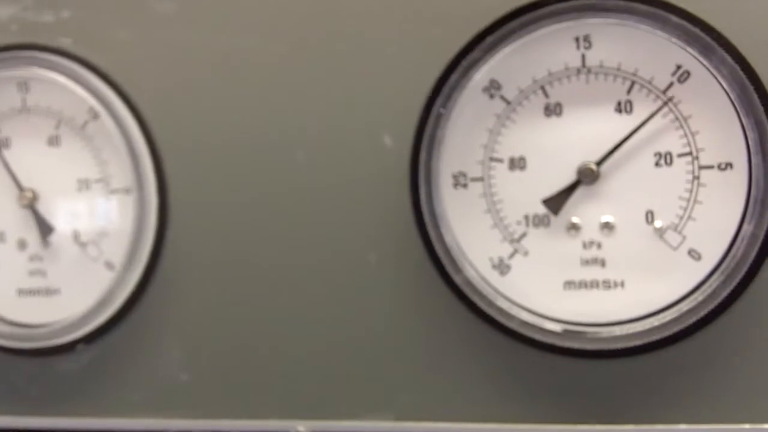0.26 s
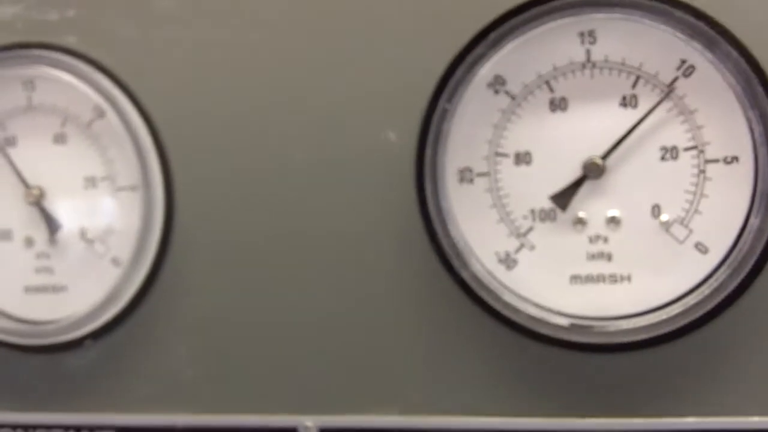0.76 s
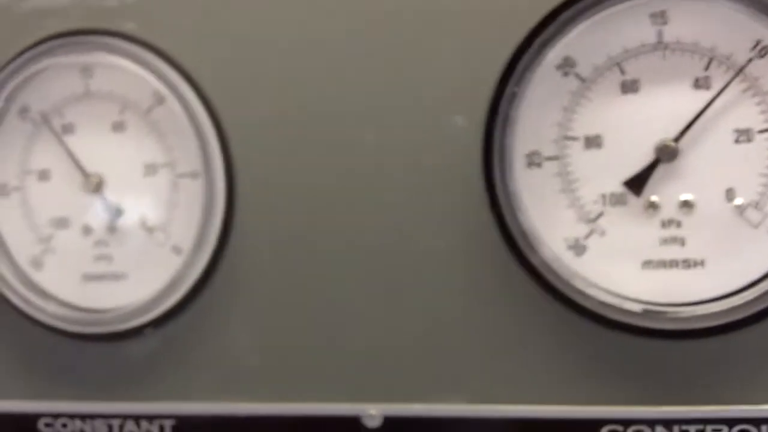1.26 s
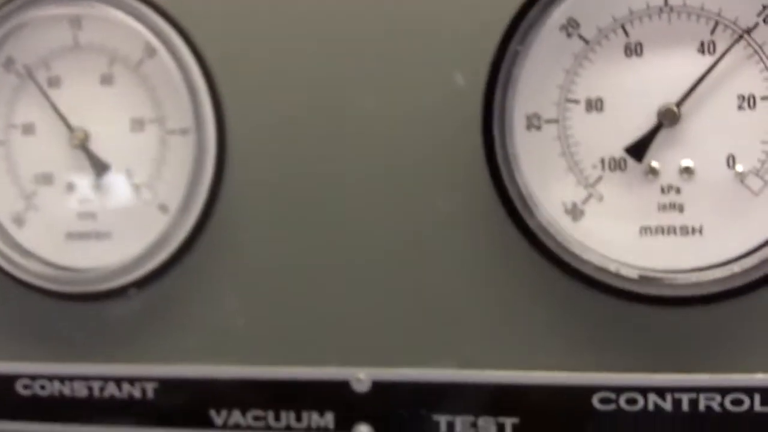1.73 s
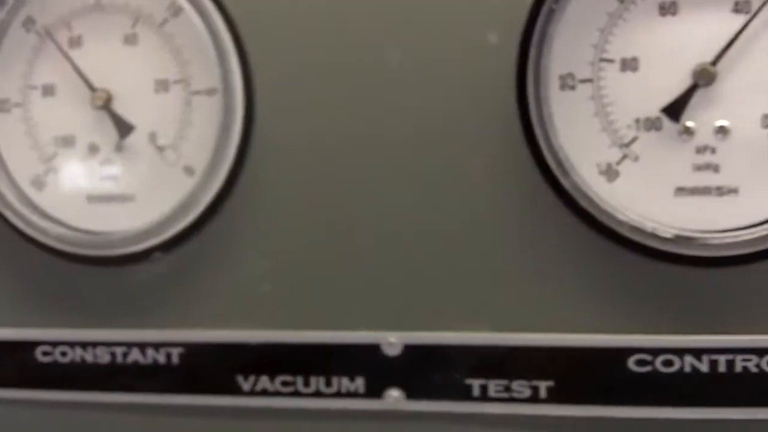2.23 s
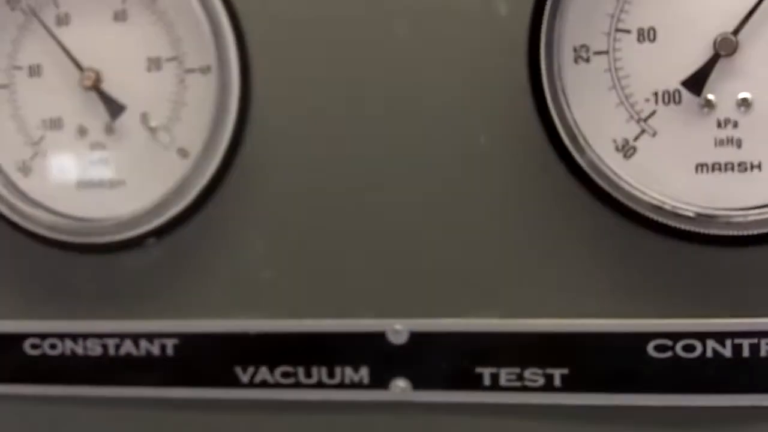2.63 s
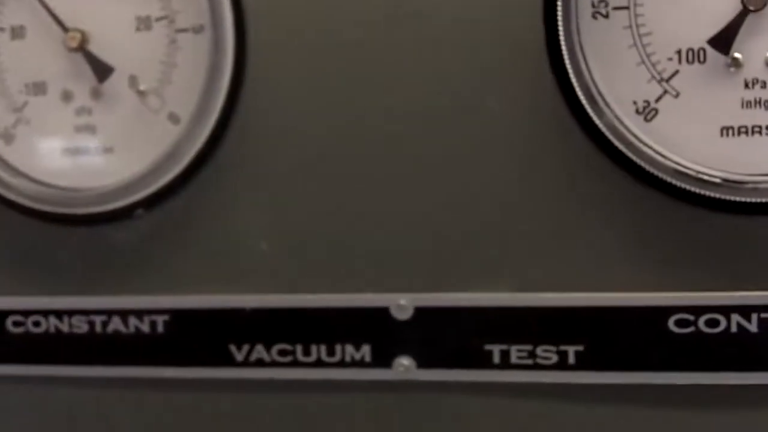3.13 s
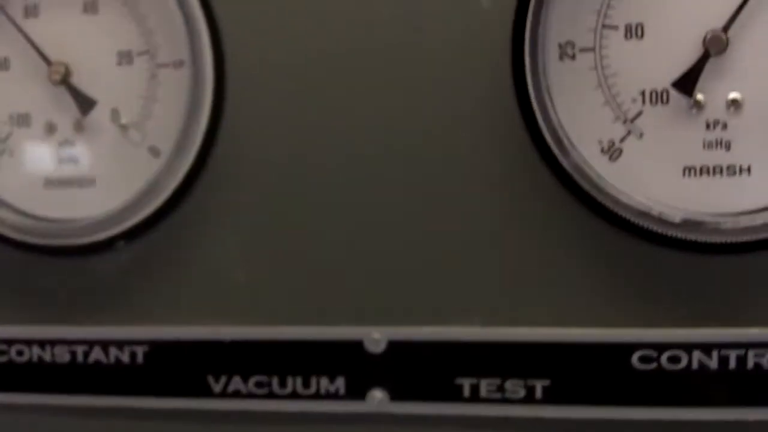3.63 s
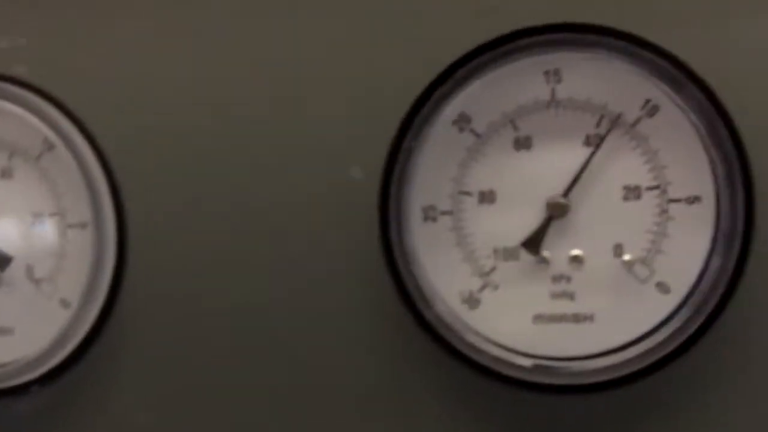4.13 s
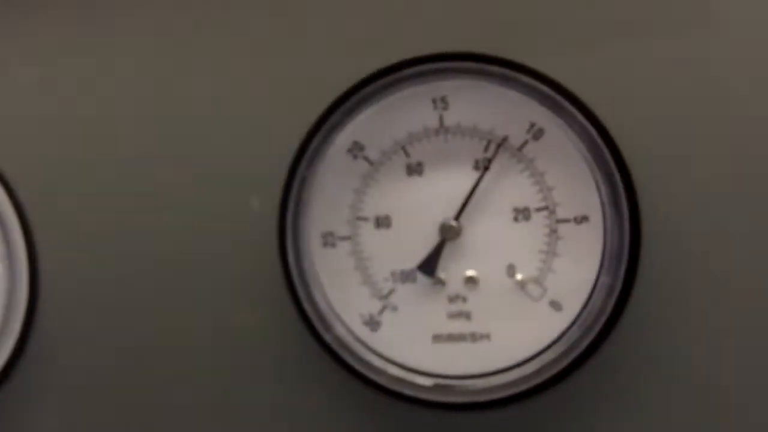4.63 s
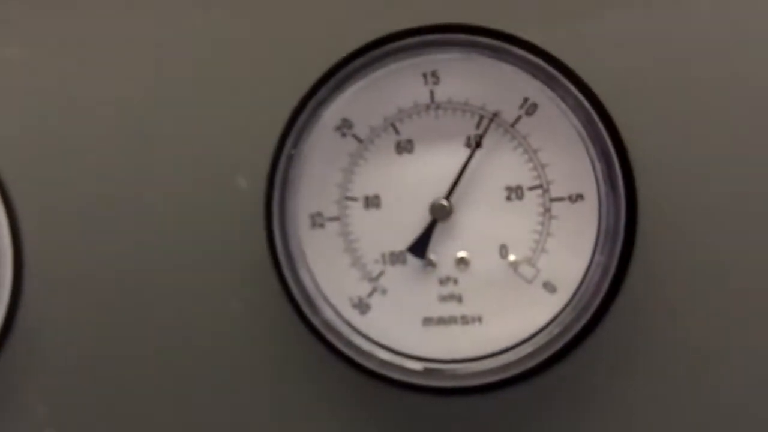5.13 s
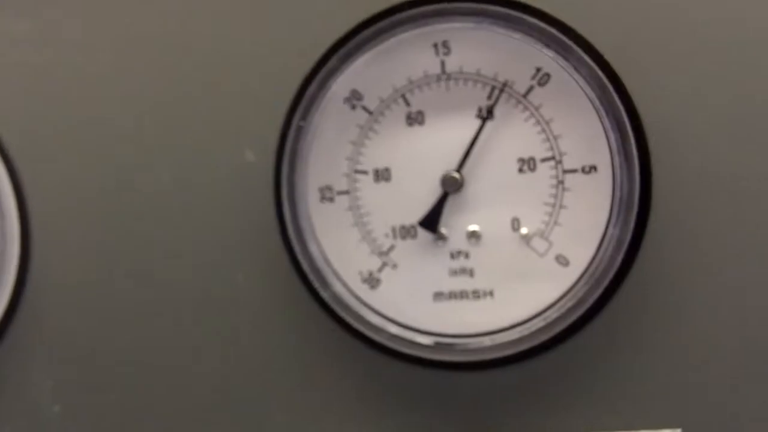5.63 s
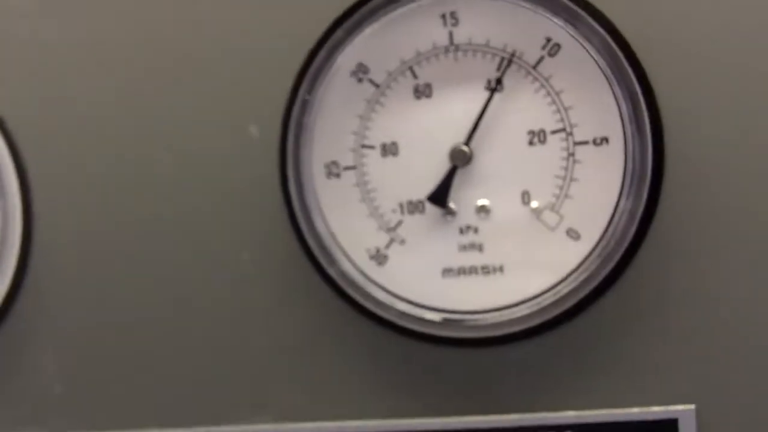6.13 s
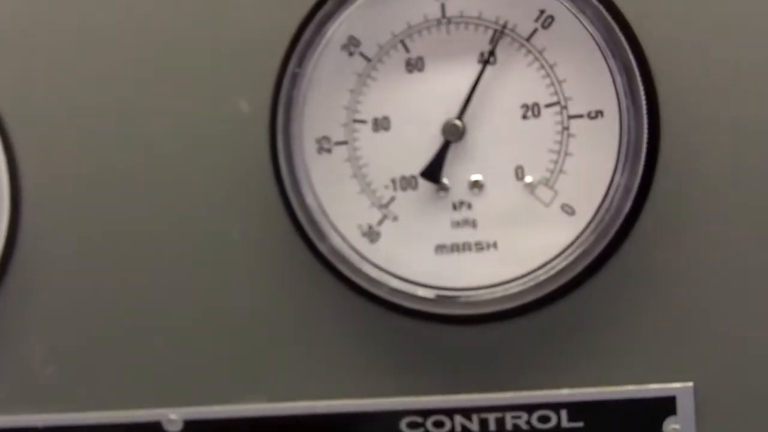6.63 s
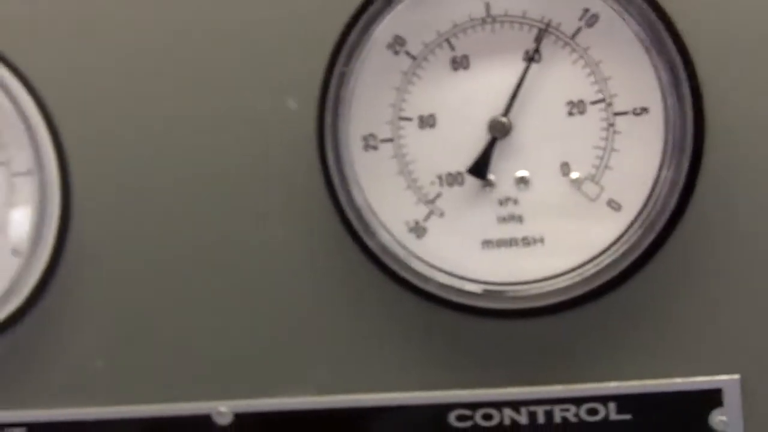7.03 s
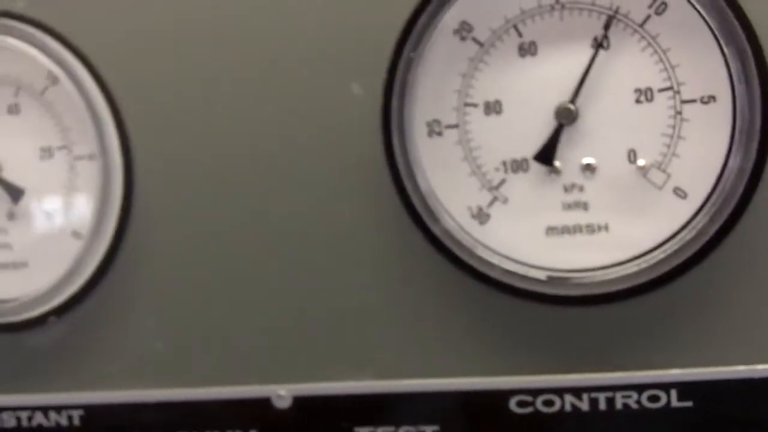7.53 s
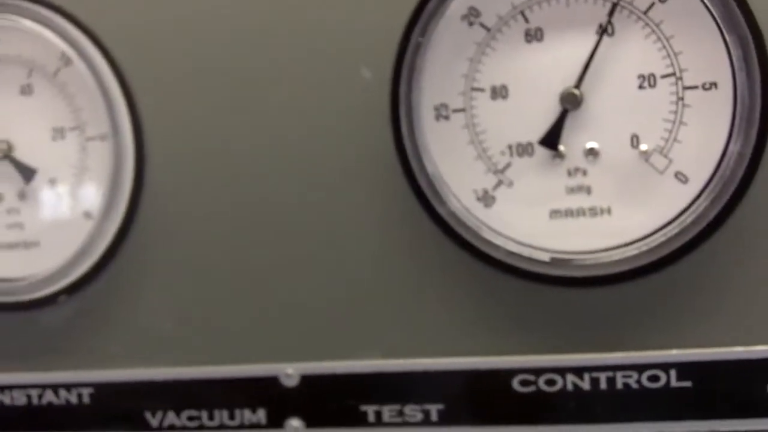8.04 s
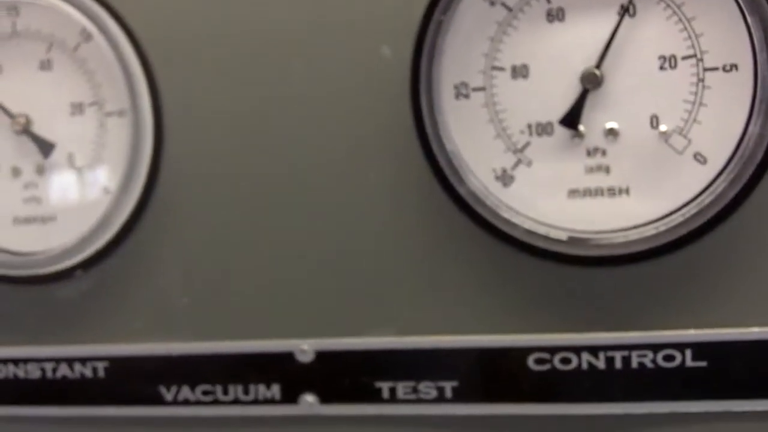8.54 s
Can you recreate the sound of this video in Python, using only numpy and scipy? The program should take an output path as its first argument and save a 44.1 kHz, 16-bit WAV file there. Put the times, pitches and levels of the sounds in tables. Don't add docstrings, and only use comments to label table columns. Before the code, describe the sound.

Close to a small vacuum pump on a workshop bench, a deep electric hum carries a rapid chugging flutter of about twenty strokes per second. The speed sags and recovers, strongest in the first half. Airy pipe noise pulses along, hollow knocks and tiny ticks increase later, and one short dry scuff comes near two and a half seconds. A second machine drones faintly farther off. Close phone pickup, nearly mono, with slight hiss.

```python
import sys
import numpy as np
from scipy import signal
from scipy.fft import rfft, irfft, next_fast_len
from scipy.io import wavfile
from scipy.ndimage import map_coordinates

SR = 44100
rng = np.random.default_rng(int(sys.argv[2]) if len(sys.argv) > 2 else 0)


def file_out(sig):
    cols = np.atleast_2d(sig).T
    lim = np.clip(cols, -1, 1)
    pcm = np.round(lim * 32767).astype(np.int16)
    wavfile.write(sys.argv[1], SR, pcm)


def magnitude_from_level(level_db):
    exponent = np.asarray(level_db, float) / 20
    return 10 ** exponent


N = 386757
T = np.arange(N) / SR

HUM_HZ = 119.95
SLOW_HZ, FAST_HZ, FREE_HZ = 20.3, 20.95, 21.07

# [mid-fall t/s, mid-recovery t/s, loss f/Hz]
SAGS = [
    (.05, 1.16, 1.08),
    (1.72, 2.46, .93),
    (3.24, 3.77, .52),
    (4.51, 4.7, .66),
    (5.8, 6.24, .33),
    (7.17, 7.36, .36),
    (7.67, 7.8, .3),
    (8.7, 9.2, .33),
]
# [shaft f/Hz, shake level/dB]
SHAKE_LAW = [(20, -30), (20.2, -34), (20.45, -36), (20.66, -33), (20.84, -27), (21.05, -24.8)]
# [shaft f/Hz, hum level/dB]
HUM_LAW = [(20, -23), (20.2, -23.5), (20.45, -22.5), (20.85, -22), (21.05, -23)]
# [multiple, slow level/dB, fast level/dB]
SHAFT_ORDERS = [(1, -50, -46), (2, -35, -38.5), (4, -50, -43), (5, -34.5, -41), (7, -56, -52),
                (8, -52, -54), (9, -52, -50), (10, -52, -56), (11, -52, -48), (13, -58, -45),
                (14, -46, -56), (27, -58, -47)]
# [multiple, slow level/dB, fast level/dB]
STROKE_ORDERS = [(16, -52, -52), (17, -45, -44), (18, -46, -46), (19, -43, -42.5), (20, -46, -49),
                 (21, -50, -48)]
# [hum multiple, added shaft order, slow level/dB, fast level/dB]
FIELD_LINES = [(1, -1, -22, -15.5), (1, 1, -13, -19.5), (1, 2, -27, -31), (1, 3, -22, -20),
               (2, -1, -30, -20.5), (2, 0, -28, -22), (2, 2, -31, -27), (3, 0, -20, -19), (5, 0, -30, -28)]
# [f/Hz, level/dB]
FAR_LINES = [(29.69, -37), (30.34, -50), (51.25, -43), (59.38, -49), (89.08, -49)]
# [f/Hz, slow level/dB, fast level/dB, extra at first level/dB]
PANELS = [(286.6, -45.5, -42, 3), (222.2, -54.5, -41.5, -1), (583.5, -47, -42.5, -2.5)]

# [f/Hz, width f/Hz, level/dB]
MOUNT_MODES = [(375, 150, 0)]
CASING_MODES = [(277.4, 20, -9), (334.5, 40, -9.5), (385.6, 19, -5.5), (397.4, 17, -4), (473, 100, -8)]
PIPE_MODES = [(551, 61, -3), (647.4, 80, 1), (773, 65.5, -1), (856, 40, -1), (960, 51, -4)]
SHELL_MODES = [(1044, 79, -4.5), (1113, 40, 2.5), (1200, 104, -2.5), (1402, 150, -3.5), (1451, 50, 1),
               (1562, 99, -8.5), (1641, 69, -4.5), (1825, 280, -13.5)]
VALVE_MODES = [(2220, 480, -4), (2550, 120, 1), (2890, 260, 2.5), (3440, 750, -6)]
COVER_MODES = [(1190, 45, 0)]
BOARD_MODES = [(600, 200, -3), (840, 220, 2), (1090, 140, 3), (1370, 120, 3), (1600, 150, -2)]
SQUEAK_MODES = [(1250, 150, -4), (1500, 200, -4), (1780, 90, 0)]

# [f/Hz, level/dB]
RUMBLE_EQ = [(8, -25), (15, -9), (35, -4), (52, 3), (60, -1), (75, -1), (100, 1), (165, 0), (205, 2),
             (230, -2), (250, -12), (330, -30), (500, -120)]
DULL_EQ = [(20, 19), (200, 8.5), (1500, -7), (2200, -6.5), (3200, -15.5), (4200, -17), (5500, -44),
           (20000, -88.5)]
TICK_EQ = [(300, 2), (1000, 9), (2500, 3), (4500, -8.5), (5600, -22), (6700, -6), (7900, -2.5), (9300, -7),
           (10500, -12), (13000, -23), (16000, -33)]
SNAP_EQ = [(1000, 5), (4500, 1), (5500, -14.5), (6700, 2), (12500, 1), (15500, -17), (17000, -40)]
GRIT_EQ = [(3000, -39.5), (3700, 3), (4900, -1), (5400, -39), (7000, -78)]
HISS_EQ = [(3000, -30), (4600, -6), (5000, -8), (5500, -17), (6300, -6), (7000, -1), (8000, 0),
           (10000, -2.5), (13200, -3), (13700, -15), (16000, -24)]
OWN_HISS_EQ = [(1200, -12), (2500, 0), (4200, -4), (5400, -14), (7000, -4), (11500, -1), (13200, -4),
               (14000, -22)]

# [t/s, peak level/dB]
TICKS = [(1.5635, -55), (2.826, -54.5), (2.9154, -57.5), (2.9999, -54.5), (3.0713, -58.5), (4.0126, -56.5),
         (4.294, -50), (4.4833, -54), (5.1562, -59.5), (5.249, -51), (5.343, -45), (5.438, -52.5),
         (5.6287, -48), (5.7696, -51), (6.5365, -54.5), (6.6309, -53.5), (6.728, -53.5), (7.1538, -46),
         (7.233, -53.5), (6.8668, -55.5), (8.109, -63.5), (8.2815, -58.5), (7.9196, -47.5), (8.631, -57),
         (8.2016, -52), (8.3465, -48), (8.4412, -52), (8.5362, -48), (4.4074, -60), (4.5615, -60.5),
         (5.5194, -62), (5.533, -59), (6.787, -64), (7.0579, -59.5), (7.5837, -57.5), (7.6625, -59),
         (8.558, -59), (8.615, -50)]
# [t/s, peak level/dB]
SNAPS = [(1.5642, -53.5), (2.9351, -58), (3.041, -52), (4.0336, -55), (5.3195, -58), (5.4549, -55),
         (6.5699, -58.5), (6.6906, -54.5), (7.753, -56), (7.8385, -52.5), (7.8929, -53), (7.9178, -57),
         (8.1335, -54), (8.1722, -54), (8.2277, -55), (8.492, -57.5)]
# [t/s, peak level/dB]
KNOCKS = [(.957, -40), (1.951, -20), (2.197, -35), (3.114, -19.5), (3.568, -25), (3.93, -19),
          (4.265, -24.5), (4.839, -30), (5.058, -19), (5.311, -26), (5.345, -15.5), (5.359, -21),
          (5.252, -16.5), (5.266, -21), (5.628, -25), (6.18, -27), (6.274, -21), (6.378, -28),
          (6.602, -15.5), (6.724, -20), (6.911, -31), (7.267, -23), (7.413, -20), (7.46, -19.5),
          (7.586, -21), (7.657, -28), (7.743, -18), (7.926, -16), (8.206, -16.5)]
# [t/s, rub level/dB, grit level/dB, squeak level/dB]
SCUFF = [
    (2.465, -55, -95, -80),
    (2.488, -32, -73, -58),
    (2.505, -33, -76, -46),
    (2.515, -35, -81, -43),
    (2.53, -36, -90, -39),
    (2.555, -41, -95, -47),
    (2.59, -70, -95, -80),
]
# [t/s, level/dB]
COVER_LEVEL = [
    (2.2, -70),
    (2.55, -47),
    (3.3, -47),
    (4.25, -47),
    (4.45, -62),
    (8.77, -60),
]


def unit(x):
    return x / np.sqrt(np.mean(x ** 2) + 1e-20)


def along(points, hz):
    f, db = np.transpose(points)
    return magnitude_from_level(np.interp(np.log(hz + 1), np.log(f + 1), db))


def curves(rows):
    s, *cols = np.transpose(rows)
    return [np.interp(T, s, c) for c in cols]


def wobble(rate_hz):
    return map_coordinates(rng.standard_normal(int(N * rate_hz / SR) + 4), [T * rate_hz])


def filtered(x, response):
    m = next_fast_len(N + SR // 2)
    return irfft(rfft(x, m) * response(np.fft.rfftfreq(m, 1 / SR)), m)[..., :N]


def modes(table):
    def response(f):
        total = 0
        for k, (centre, width, db) in enumerate(table):
            damping = 1j * f * width
            total = total + (-1) ** k * magnitude_from_level(db) * damping / (centre * centre - f * f + damping)
        return along(DULL_EQ, f) * total
    return response


def tone(turns, db):
    return np.sqrt(2) * magnitude_from_level(db) * np.cos(2 * np.pi * turns)


def blend(fast, slow_db, fast_db):
    return slow_db + (fast_db - slow_db) * fast


def soft(blows, contact_s):
    shape = np.hanning(int(contact_s * SR) + 3)
    return signal.fftconvolve(blows, shape / shape.sum())[:N]


def strokes(turn, lag, jitter_s, scatter_db):
    at = np.flatnonzero(np.diff(np.floor(turn - lag)))
    chance = rng.standard_normal((len(at), 2))
    late = (jitter_s * SR * chance[:, 0]).astype(int)
    blows = np.zeros(N)
    blows[np.clip(at + late, 0, N - 1)] = magnitude_from_level(scatter_db * chance[:, 1])
    return blows


def breath(turn, lag, once_db, twice_db, rough_db):
    angle = 2 * np.pi * (turn - lag)
    swell_db = once_db * np.cos(angle) + twice_db * np.cos(2 * angle) + rough_db * wobble(25)
    return magnitude_from_level(swell_db) * rng.standard_normal(N)


def flow(fast, first_db, built_db, fast_db):
    vacuum = 1 - np.exp(-T / 3.7)
    return first_db + built_db * vacuum + fast_db * fast + .15 * wobble(7.7)


def shaft():
    fall_s, rise_s, shake_lag_s = .065, .11, .1

    def step(s, width_s):
        return .5 + .5 * np.tanh((T - s) / (2 * width_s))

    hz = FREE_HZ - sum(loss * step(fall, fall_s) * (1 - step(rise, rise_s)) for fall, rise, loss in SAGS)
    fast = np.clip((hz - SLOW_HZ) / (FAST_HZ - SLOW_HZ), 0, 1)
    shake_hz = np.minimum(hz, np.interp(T - shake_lag_s, T, hz))
    shake_db = np.interp(shake_hz, *np.transpose(SHAKE_LAW))
    hum_db = np.interp(hz, *np.transpose(HUM_LAW))
    return np.cumsum(hz) / SR - .13, fast, shake_db, hum_db


def far_machine(fast):
    (hz, db), *sides = FAR_LINES
    out = tone(hz * T, db + .71 * wobble(2.5))
    for f, d in sides:
        out = out + tone(f * T + rng.random(), d - 7 * (1 - fast) + 2.5 * wobble(4.54))
    return out


def scuff():
    colours = modes(BOARD_MODES), lambda f: along(GRIT_EQ, f), modes(SQUEAK_MODES)
    out = 0
    for db, colour in zip(curves(SCUFF), colours):
        rub = magnitude_from_level(.95 * wobble(60)) * rng.standard_normal(N)
        out = out + magnitude_from_level(db) * unit(filtered(rub, colour))
    return out


def loose_part(turn, fast):
    tick_t60_s, tail_t60_s, tail_db, strike_db = .04, .22, -14.5, 11.5
    graze_share, graze_db = .15, -63
    out = np.zeros((2, N + SR))
    t = np.arange(SR // 5) / SR
    shape = magnitude_from_level([-60 * t / tick_t60_s, tail_db - 60 * t / tail_t60_s])

    at = np.flatnonzero(np.diff(np.floor(turn)))
    grazes = []
    for i, (late, size, odds) in zip(at, rng.random((len(at), 3))):
        if odds < graze_share * fast[i] ** 2 * np.sqrt(i / N):
            grazes.append((i / SR + .049 * late, graze_db + 5 * size))

    for s, db in list(TICKS) + grazes:
        i = round(s * SR)
        out[:, i:i + len(t)] += magnitude_from_level(db + 1.3) * shape * rng.standard_normal(shape.shape)
        out[0, i] = magnitude_from_level(db + strike_db)

    def tail_response(f):
        body = 1 + magnitude_from_level(8.5) / (1 + (f / 4000) ** 6)
        return body / (1 + (f / 9500) ** 6)

    ticks = out[0, :N] + filtered(out[1, :N], tail_response)

    specks = (rng.random(N) < 18 / SR) * magnitude_from_level(-47 - 7.5 * rng.random(N))
    specks = specks * (.18 + fast * np.sqrt(T / T[-1]))
    for s, db in SNAPS:
        specks[round(s * SR)] = magnitude_from_level(db + 11)
    return filtered(ticks, lambda f: along(TICK_EQ, f)) + filtered(specks, lambda f: along(SNAP_EQ, f))


def cover(turn):
    taps = soft(strokes(turn, lag=.64, jitter_s=.0015, scatter_db=2.5), contact_s=.0004)
    return magnitude_from_level(curves(COVER_LEVEL)[0]) * unit(filtered(taps, modes(COVER_MODES)))


def panels(fast):
    early = np.exp(-(T / 2.2) ** 2)
    out = 0
    for hz, slow_db, fast_db, first_db in PANELS:
        db = blend(fast, slow_db, fast_db) + first_db * early - 3
        db = db + 1.8 * wobble(9.6) + 2 * wobble(1.5)
        out = out + tone(hz * T + .22 * wobble(9), db)
    return out


def motor(turn, fast, hum_db):
    field = HUM_HZ * T - .32
    hum = tone(field + .004 * wobble(8), .32 * wobble(16))
    for k, order, slow_db, fast_db in FIELD_LINES:
        turns = k * field + order * turn - .33 + .03 * k * wobble(5)
        hum = hum + tone(turns, blend(fast, slow_db, fast_db) + 1.3 * wobble(6))
    return magnitude_from_level(hum_db) * hum


def imbalance(turn, fast, shake_db):
    lag, skew = .52, .26
    out = tone(3 * (turn - lag) - skew, shake_db + .7 * wobble(14))
    for k, slow_db, fast_db in SHAFT_ORDERS:
        turns = k * (turn - lag) - skew + .067 * wobble(3)
        out = out + tone(turns, blend(fast, slow_db, fast_db) + 1.3 * wobble(5.9))
    return out


def stroke_ring(turn, fast):
    out = 0
    for k, slow_db, fast_db in STROKE_ORDERS:
        turns = k * (turn - .72) + .05 * wobble(6)
        out = out + tone(turns, blend(fast, slow_db, fast_db) + 2.3 * wobble(5))
    return out


def knocks():
    s, db = np.transpose(KNOCKS)
    blows = np.zeros(N)
    blows[(s * SR).astype(int)] = magnitude_from_level(db - 1.5)
    lead = SR // 50
    ring = filtered(soft(T == T[lead], contact_s=.00085), modes(PIPE_MODES))[:SR // 4]
    return signal.fftconvolve(blows, ring / abs(ring).max())[lead:][:N]


def pump(turn, fast):
    main = soft(strokes(turn, lag=.68, jitter_s=.0003, scatter_db=2.5), contact_s=.0009)
    back = soft(strokes(turn, lag=.46, jitter_s=.0005, scatter_db=3), contact_s=.0009)
    blows = magnitude_from_level(blend(fast, 1, -3)) * main + magnitude_from_level(blend(fast, -9, 0)) * back

    def air_through(response, *swell):
        return unit(filtered(breath(turn, *swell), response))

    low = air_through(lambda f: along(RUMBLE_EQ, f), .12, .06, .55, 1.4)
    casing_blows = unit(filtered(filtered(blows, modes(MOUNT_MODES)), modes(CASING_MODES)))
    casing_air = air_through(modes(CASING_MODES), .38, .42, .25, .2)
    casing = unit(.85 * casing_blows + magnitude_from_level(4 * fast) * casing_air)
    pipe_blows = unit(filtered(blows, modes(PIPE_MODES)))
    pipe = unit(.08 * pipe_blows + air_through(modes(PIPE_MODES), .6, .26, .49, .83))
    shell = air_through(modes(SHELL_MODES), .75, .64, .43, 1)
    fizz = air_through(modes(VALVE_MODES), .96, .94, .4, 1.6)

    low = magnitude_from_level(-42 + 7 * fast) * low
    casing = magnitude_from_level(flow(fast, first_db=-34, built_db=1, fast_db=-1)) * casing
    pipe = magnitude_from_level(flow(fast, first_db=-37, built_db=2, fast_db=2.5)) * pipe
    shell = magnitude_from_level(flow(fast, first_db=-45.5, built_db=2.5, fast_db=2)) * shell
    fizz = magnitude_from_level(flow(fast, first_db=-68, built_db=0, fast_db=0)) * fizz
    gust = magnitude_from_level(.5 * wobble(11))
    return low + casing + gust * (pipe + shell) + fizz


def scene():
    turn, fast, shake_db, hum_db = shaft()
    air = far_machine(fast) + scuff() + loose_part(turn, fast) + cover(turn) + panels(fast)
    air = air + motor(turn, fast, hum_db) + imbalance(turn, fast, shake_db) + stroke_ring(turn, fast)
    air = air + knocks() + pump(turn, fast)
    return np.array([air, air])


def roll_off(x):
    return signal.sosfilt(signal.butter(12, 15100, fs=SR, output="sos"), x)


def record(dry):
    side = magnitude_from_level(-31.5) * filtered(dry[0], lambda f: 1 / (1 + (f / 220) ** 2.4))
    hiss = rng.standard_normal((2, N))
    common, own = filtered(hiss, lambda f: np.array([along(HISS_EQ, f), along(OWN_HISS_EQ, f)]))
    flicker_db = .73 * wobble(14) + 1.2 * wobble(33)
    common = magnitude_from_level(-78.5) * unit(magnitude_from_level(flicker_db) * common)
    own = magnitude_from_level(-80) * unit(magnitude_from_level(.65 * flicker_db) * own)
    offset = np.array([[.0188], [.0388]])
    gate = np.sin(np.pi / 2 * np.clip(np.minimum(T, T[-1] - T) / .003, 0, 1)) ** 2
    mix = gate * (dry + np.array([-side, side]) + offset) + common + np.array([own, -own])
    return roll_off(mix)


dry = scene()
out = record(dry)
file_out(out)
```